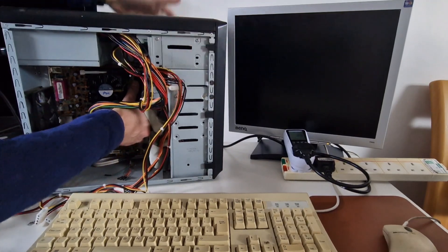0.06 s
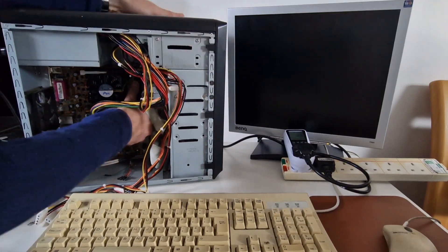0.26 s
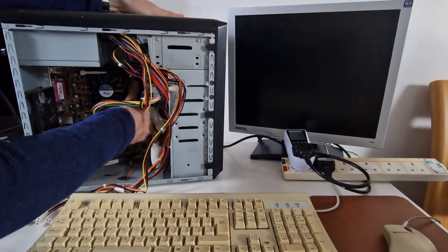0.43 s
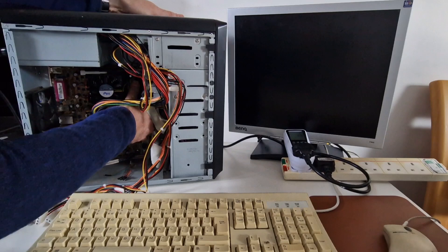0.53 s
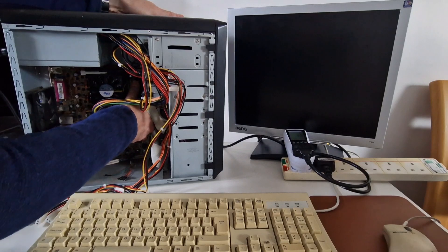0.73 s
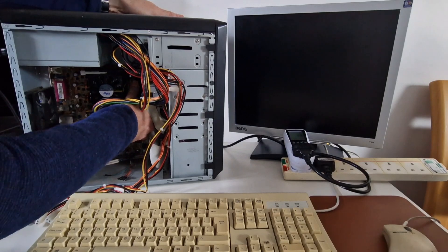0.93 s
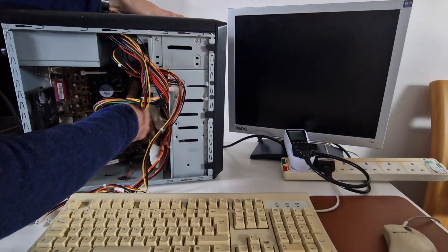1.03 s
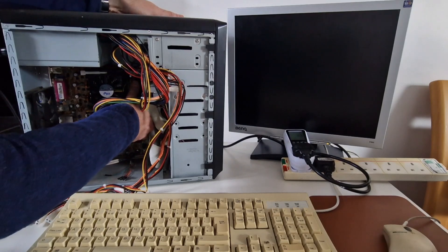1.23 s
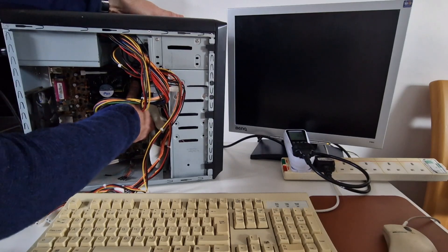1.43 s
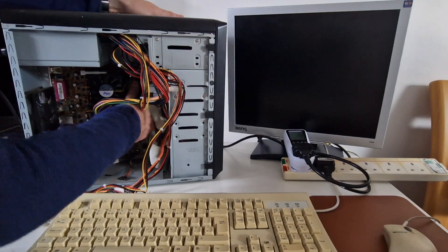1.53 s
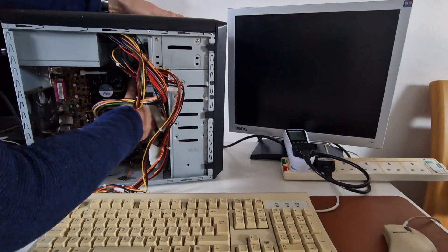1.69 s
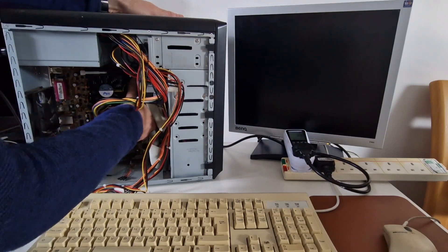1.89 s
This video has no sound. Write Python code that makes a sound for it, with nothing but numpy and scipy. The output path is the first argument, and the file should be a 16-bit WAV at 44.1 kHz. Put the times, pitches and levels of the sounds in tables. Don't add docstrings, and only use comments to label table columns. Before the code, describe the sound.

Knocks and latch clicks as hands push a part into a computer's circuit board, quiet room

```python
import sys
import numpy as np
from scipy import signal
from scipy.fft import rfft, irfft
from scipy.io import wavfile
from scipy.ndimage import uniform_filter1d

SR = 44100
rng = np.random.default_rng(int(sys.argv[2]) if len(sys.argv) > 2 else 0)


def log_audio(samples):
    frames = np.atleast_2d(samples).T
    limited = np.clip(frames, -1, 1)
    pcm = np.round(limited * 32767).astype(np.int16)
    wavfile.write(sys.argv[1], SR, pcm)


def makeup_ratio(level_db):
    decades = np.asarray(level_db, float) / 20
    return 10 ** decades


N = 85995

# f/Hz, share [0-1]
LIKENESS = [(40, .997), (170, .995), (430, .9), (1150, .4), (4100, .12)]
SNAP_LEAD, THUMP_LEAD = 88, 1323


def evened(x):
    return x / np.sqrt(np.mean(x ** 2) + 1e-20)


def read(points, hz):
    f, value = np.transpose(points)
    return np.interp(np.log(hz + 1), np.log(f + 1), value)


def add(mix, s, sound):
    part = mix[max(round(s * SR), 0):][:len(sound)]
    part += sound[:len(part)]


def lumpy(size, depth_db, smooth):
    return makeup_ratio(depth_db * evened(uniform_filter1d(rng.standard_normal(size), smooth)))


def pair(left, other, same):
    return np.array([left, same * left + np.sqrt(1 - same ** 2) * other])


def diffuse(size, gain):
    frames = size // 128 + 5
    hz = np.fft.rfftfreq(512, 1 / SR)[:, None]
    a, b, c, d = rng.standard_normal((frames, 257, 4)).T
    same = np.clip(read(LIKENESS, hz), 0, 1)
    z = pair(a + 1j * b, c + 1j * d, same) * gain(hz, np.arange(frames) * 128 / SR)
    return signal.istft(z, nperseg=512, noverlap=384)[1][:, :size]


def hush():
    # f/Hz, density/dB per Hz
    air_tone = [(16, -26), (48, 7.5), (165, -4.5), (335, -8.5), (530, -20), (2100, -28), (8600, -33.5),
                (10300, -43.5)]
    tone_db, whine_hz, whine_db = -68, 8990, -100.5
    hz = np.fft.rfftfreq(N, 1 / SR)
    flat = diffuse(N, lambda f, t: 1 + 0 * t)
    air = irfft(rfft(flat) * makeup_ratio(read(air_tone, hz)), N) * lumpy(N, 1.6, 2500)
    whine = np.sin(2 * np.pi * whine_hz * np.arange(N) / SR)
    return makeup_ratio(tone_db) * evened(air) + makeup_ratio(whine_db) * whine


def rustle():
    # t/s, level/dB
    movement = [(0, -63), (0.068, -64), (0.198, -63), (0.499, -65.5), (0.679, -64.5), (.8, -80),
                (1.06, -70.5), (1.15, -74), (1.501, -77.5), (1.63, -61.5), (1.761, -63), (1.87, -60.5),
                (1.95, -74.5)]
    # f/Hz, level/dB
    cloth_tone = [(60, -12.5), (200, 3), (600, -7.5), (1500, -16), (3000, -25), (8000, -30.5),
                  (15000, -45.5)]
    noise = diffuse(N, lambda hz, t: makeup_ratio(read(cloth_tone, hz)) + 0 * t)
    cloth = evened(noise * lumpy(N, 2.5, 300))
    return cloth * makeup_ratio(np.interp(np.arange(N) / SR, *np.transpose(movement)))


def tail(t60, send, build_s):
    def decay(hz, t):
        t60_s = read(t60, hz)
        return makeup_ratio(read(send, hz) - 60 * t / t60_s) / np.sqrt(t60_s)

    t = np.arange(SR // 2) / SR
    unit = np.sqrt(6 * np.log(10) / SR / 170)
    return unit * diffuse(SR // 2, decay) * (1 - np.exp(-(t / build_s) ** 2))


def room_tail():
    # f/Hz, t60/s
    walls_t60 = [(105, .6), (305, 0.69), (1050, 0.93), (4200, 0.28), (12800, .5)]
    # f/Hz, level/dB
    walls_send = [(105, -18.5), (255, -20.5), (720, -24.5), (2050, -22.5), (4000, -11.5), (6200, -10),
                  (14200, -21.5)]
    return tail(walls_t60, walls_send, 0.0091)


def case_tail():
    # f/Hz, t60/s
    box_t60 = [(105, 0.032), (255, 0.18), (720, 0.26), (2050, 0.23), (5200, 0.16), (12800, 0.061)]
    # f/Hz, level/dB
    box_send = [(105, -13.5), (255, -11), (450, -3), (720, -1), (1200, -2), (2300, -0.5), (6200, -3),
                (14200, -10)]
    return tail(box_t60, box_send, 0.0039)


def panels():
    # f/Hz, level/dB, t60/s
    modes = [(95, -5.5, 0.35), (138, -7.5, .3), (188.4, -15, 0.05), (262.4, -6, 0.073), (447.7, 4, 0.26),
             (579.5, -15, 0.2), (658, -8, .15), (712, -7, 0.16), (885, -13, 0.19), (1126, -5.5, 0.12),
             (1325, -14.5, .15), (1423, -12.5, .12), (1620, -8, .18), (2000, -10.5, 0.12)]
    t = np.arange(SR // 2) / SR
    rings = np.zeros(len(t))
    for hz, db, t60_s in modes:
        phase = 2 * np.pi * rng.random()
        rings += makeup_ratio(db - 60 * t / t60_s) * np.sin(2 * np.pi * hz * t + phase)
    return makeup_ratio(-24.5) * rings / np.linalg.norm(rings)


def scrape(length_s, db, hz, width_hz):
    rise, fade_db = .2, -14
    f = np.fft.rfftfreq(4096, 1 / SR)
    stroke = np.arange(4096) / SR / length_s
    same = np.clip(np.maximum(.5, read(LIKENESS, f)), 0, 1)
    left, other = rfft(rng.standard_normal((2, 4096)) * lumpy(4096, 2.5, 40))
    resonance = 1 / (1 + (2 * (f - hz) / width_hz) ** 2)
    band = irfft(pair(left, other, same) * resonance)
    return evened(band) * np.minimum(stroke / rise, 1) * makeup_ratio(db + fade_db * stroke ** 2)


def thump(db, hz, rise_s, fall_s):
    t = np.arange(-THUMP_LEAD, 6000) / SR
    swell = np.where(t < 0, np.exp(-(t / rise_s) ** 2), np.exp(-abs(t) / fall_s))
    return makeup_ratio(db) * np.cos(2 * np.pi * hz * t) * swell


def snap(db, hz, rebound_db, direction):
    cycles, settle, edge_cycles = .42, 2.2, .13
    bounce_s, ring_hz, ring_rise_s, ring_fall_s = .00095, 640, .0006, .0014
    t = np.arange(-SNAP_LEAD, 600) / SR
    swing_decay = np.exp(-abs(t * hz / cycles) * np.where(t > 0, settle, 1))
    swing = np.sin(2 * np.pi * hz * t + 1.05) * swing_decay
    u = t - bounce_s
    swell = np.where(u < 0, np.exp(-(u / ring_rise_s) ** 2), np.exp(-abs(u) / ring_fall_s))
    rebound = makeup_ratio(rebound_db) * .6 * swell * np.cos(2 * np.pi * ring_hz * u)
    sharp = direction * makeup_ratio(db) * (swing - rebound)
    blunt = round(edge_cycles * SR / hz)
    return uniform_filter1d(uniform_filter1d(sharp, size=blunt), size=blunt)


def rubbing():
    # start t/s, length/s, rms level/dB, centre f/Hz, width/Hz
    rubs = [(.001, .015, -61.5, 860, 1350), (.2155, .008, -46, 6000, 14000), (.2155, .025, -40, 1400, 600),
            (.2197, .043, -36, 970, 1600), (.222, .03, -45, 3500, 10000), (.239, .04, -21.5, 700, 1200),
            (.24, .014, -30, 1150, 250), (.24, .018, -33, 2030, 250), (.2405, .022, -30, 5000, 14000),
            (.25, .015, -40, 12000, 8000), (.27, .07, -47.5, 5560, 14000), (.33, .08, -58, 4000, 6000),
            (.378, .059, -61.5, 1860, 110), (.4, .03, -62, 1620, 90), (.429, .005, -65, 5100, 4000),
            (.4405, .003, -63, 5500, 4000), (.521, .014, -59, 10000, 12000),
            (.5235, .004, -52, 5000, 10000), (.54, .025, -57, 650, 500), (.645, .03, -71, 2050, 200),
            (.887, .05, -62, 500, 500), (.9005, .0065, -70, 12100, 8100), (.9404, .01, -72, 3850, 2120),
            (1.083, .0097, -74.5, 3100, 6280), (1.2015, .008, -45, 6000, 14000),
            (1.2032, .028, -33, 750, 1100), (1.2065, .011, -37, 7000, 16000), (1.207, .008, -34, 1000, 900),
            (1.2093, .004, -32, 4600, 1800), (1.2095, .004, -38, 7600, 1200),
            (1.292, .01, -58, 12200, 7030), (1.631, .068, -58, 490, 520), (1.6925, .0086, -61.5, 3220, 510),
            (1.707, .012, -64, 4000, 3500), (1.745, .02, -66, 3030, 950), (1.8412, .009, -51, 1300, 500),
            (1.8421, .011, -65, 7020, 380), (1.843, .05, -58, 2050, 400), (1.85, .035, -56, 900, 900)]
    sides = np.zeros((2, N))
    for s, *row in rubs:
        for side, sound in zip(sides, scrape(*row)):
            add(side, s, sound)
    return sides


def pushing():
    # peak t/s, peak level/dB, f/Hz, rise/s, fall/s
    pushes = [(0.2252, -18.5, 122, 0.0021, 0.006), (0.2355, -16.5, 356, 0.0027, 0.0011),
              (0.2445, -3.5, 265.4, 0.0041, 0.0035), (0.249, -12, 334, 0.0019, 0.0024),
              (0.2517, -15, 306.4, 0.0015, 0.0013), (0.2561, -21.5, 330, 0.0013, 0.0046),
              (0.2447, -22.5, 139, 0.0046, 0.011), (0.267, -29, 204.2, 0.008, 0.01),
              (.3, -36, 138, .02, 0.03), (.46, -52.5, 107.3, 0.023, 0.026),
              (0.2829, -21, 244, 0.008, 0.0054), (0.11, -41, 143, 0.0023, 0.0043),
              (0.5463, -49.5, 386, 0.0042, 0.0038), (0.8979, -49, 236.8, 0.0083, 0.017),
              (1.2074, -31.5, 210, 0.0048, 0.0054), (1.2147, -23, 322, .002, .005),
              (1.223, -27.5, 224, 0.0045, 0.011), (1.241, -33, 146, 0.0058, 0.011),
              (1.5842, -41.5, 400, 0.00037, 0.0015), (1.65, -43.5, 394, 0.0013, 0.0018),
              (1.7073, -37, 122, 0.0061, 0.0074), (1.7522, -37.5, 188, 0.0027, 0.0017),
              (1.7926, -39.5, 110.4, 0.0085, 0.0068), (1.8576, -45.5, 150, 0.0083, 0.013),
              (1.9505, -47.5, 210, 0.0066, .0052)]
    sides = np.zeros((2, N))
    for s, *row in pushes:
        for side in sides:
            add(side, s - THUMP_LEAD / SR, thump(*row))
    return sides


def latching():
    # t/s, peak level/dB, f/Hz, rebound level/dB, direction [+1 out, -1 in]
    clicks = [(.0884, -21, 2000, -11, 1), (.3469, -35, 1700, -6, 1), (.5373, -38, 1200, 0, 1),
              (.6943, -33.5, 1300, -4, -1), (.7524, -51, 800, 2, 1), (1.2113, -17.5, 1100, -8, 1),
              (1.5425, -22.5, 2200, -10, 1), (1.688, -45, 1000, -3, -1), (1.8103, -37, 1250, -3, -1),
              (1.8738, -38, 1400, -6, 1), (1.534, -47, 800, -3, -1), (.8854, -54, 900, -4, 1),
              (1.9486, -49, 2100, -7, 1)]
    sides = np.zeros((2, N))
    for s, *row in clicks:
        for lag, side in enumerate(sides):
            add(side, s + (lag - SNAP_LEAD) / SR, snap(*row))
    return sides


def far_side(x):
    lag, shadow_hz, shadow_db = 11, 7100, -3.5
    hz = np.fft.rfftfreq(N, 1 / SR)
    shadow = makeup_ratio(shadow_db * hz ** 2 / (hz ** 2 + shadow_hz ** 2))
    return irfft(rfft(x) * shadow * np.exp(-2j * np.pi * hz * lag / SR), N)


def scene():
    desk_cut_hz, latch_send_db, left_db = 54, -3, 2.6
    latches = latching()
    high_pass = signal.butter(2, desk_cut_hz, "high", fs=SR, output="sos")
    hands = signal.sosfiltfilt(high_pass, pushing() + rubbing())
    touches = hands[0] + makeup_ratio(latch_send_db) * latches[0]
    left, right = hands + signal.fftconvolve(touches, panels())[:N]
    near = np.array([left, far_side(right)]) + latches
    space = case_tail() + room_tail()
    wet = signal.fftconvolve(touches[None], space, axes=1)[:, :N]
    balance = makeup_ratio(np.array([[left_db / 2], [-left_db / 2]]))
    return (near + wet) * balance + hush() + rustle()


def top_cut(x):
    return signal.sosfilt(signal.butter(12, 16420, fs=SR, output="sos"), x)


def record(dry):
    top_hz = 15990
    limited = irfft(rfft(dry) * (np.fft.rfftfreq(N, 1 / SR) < top_hz), N)
    return top_cut(limited)


dry = scene()
out = record(dry)
log_audio(out)
```